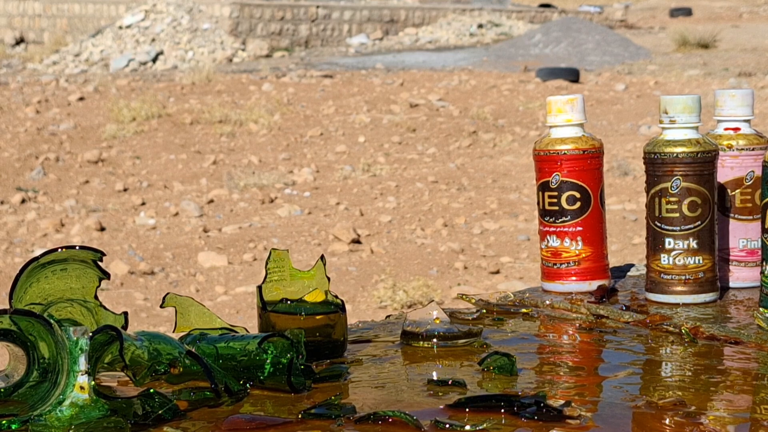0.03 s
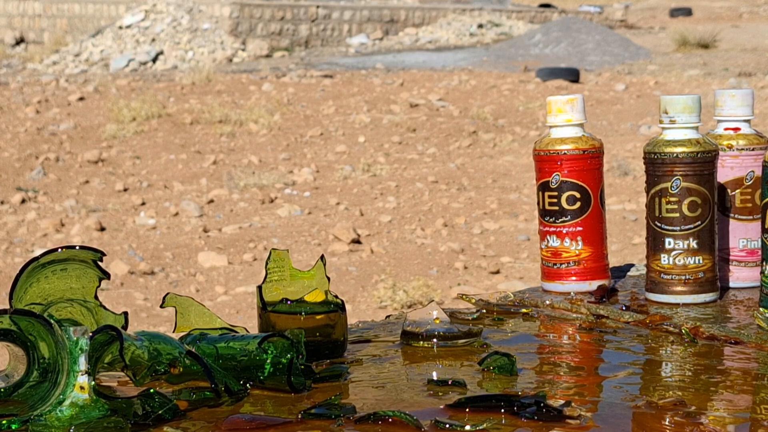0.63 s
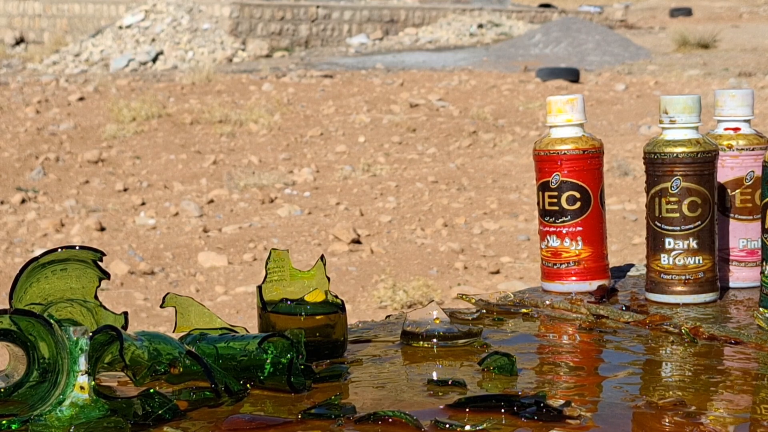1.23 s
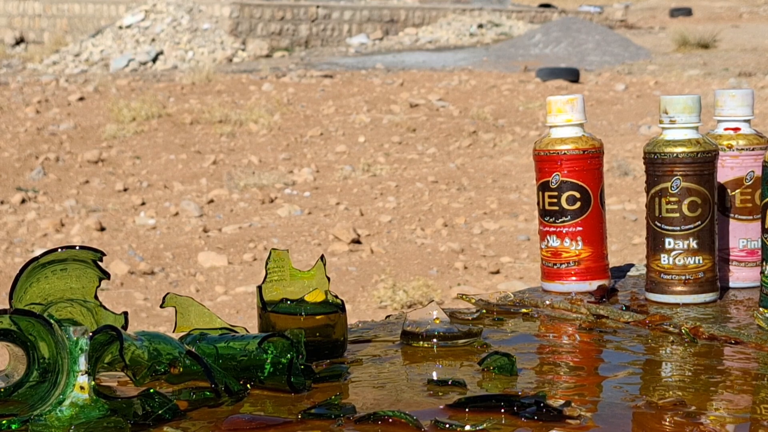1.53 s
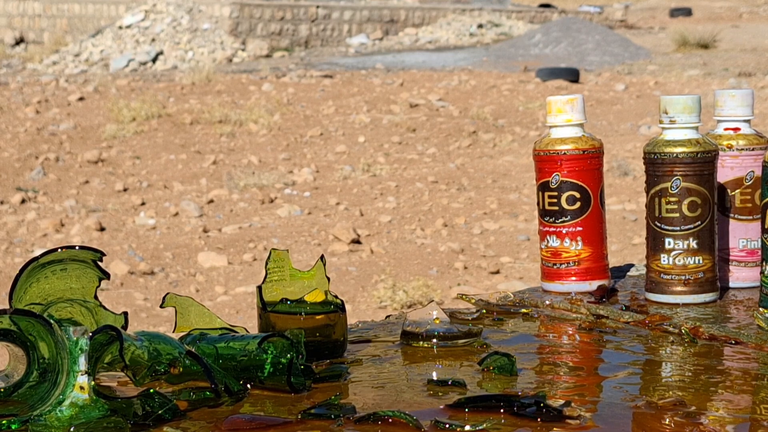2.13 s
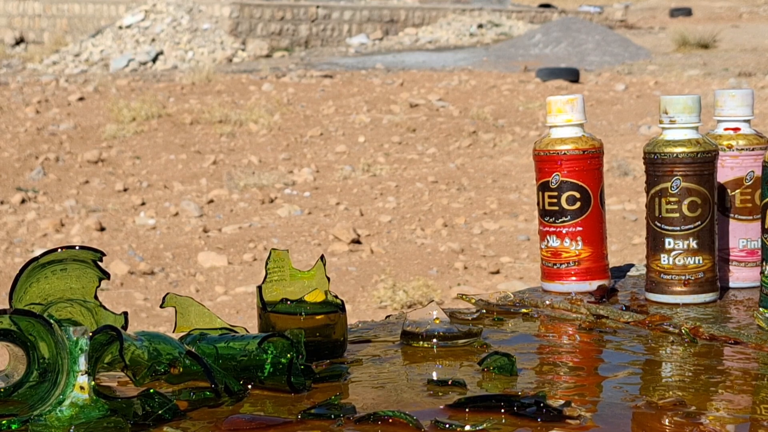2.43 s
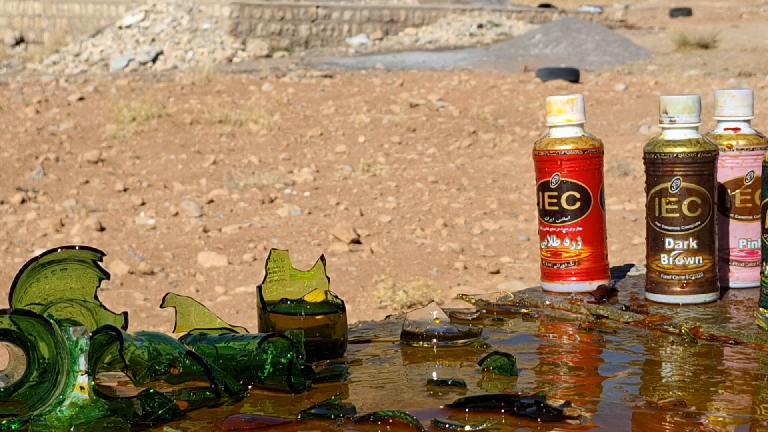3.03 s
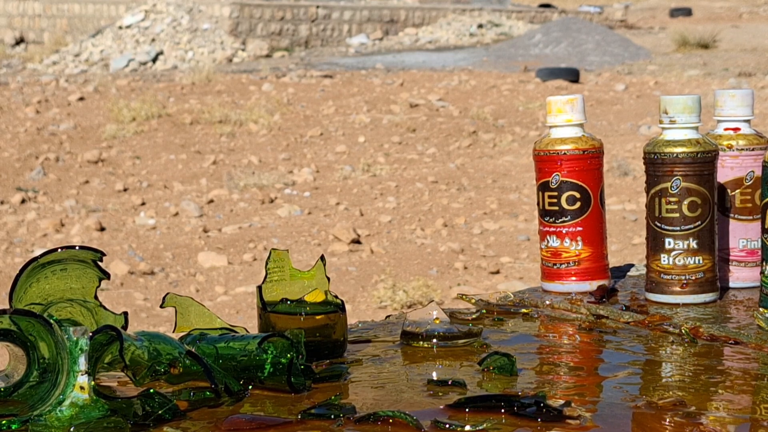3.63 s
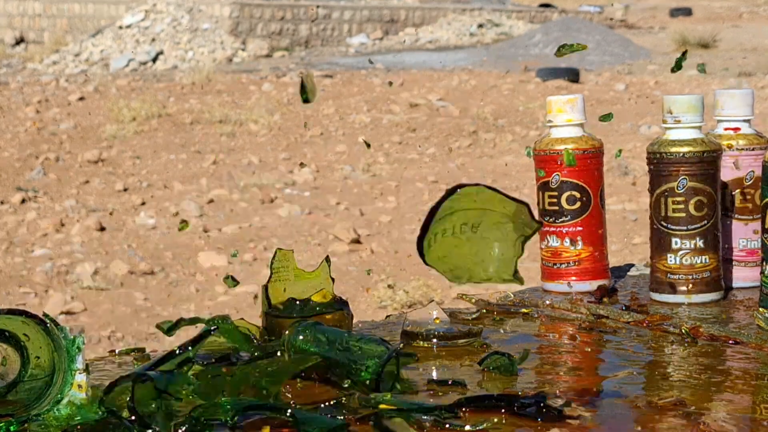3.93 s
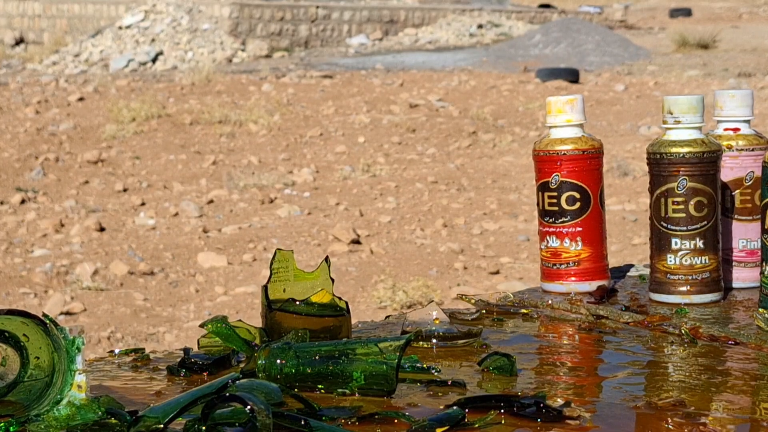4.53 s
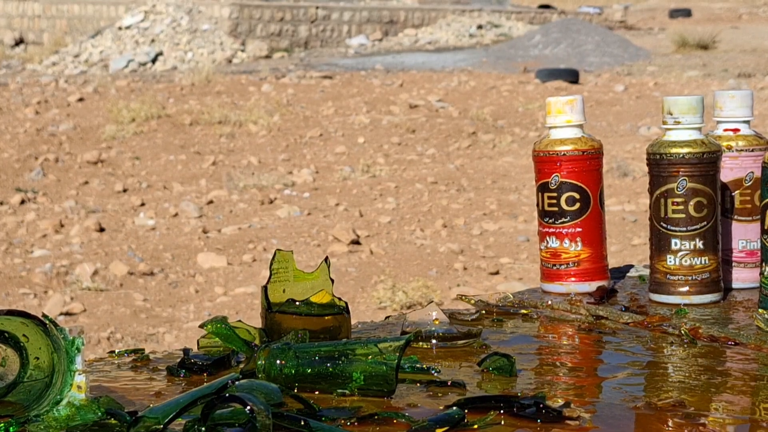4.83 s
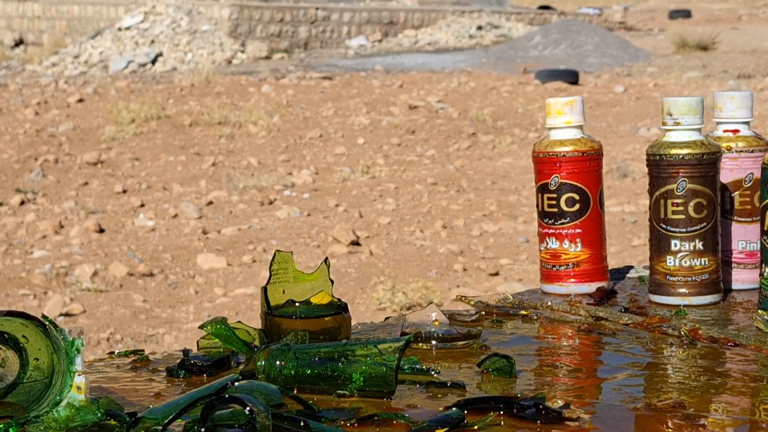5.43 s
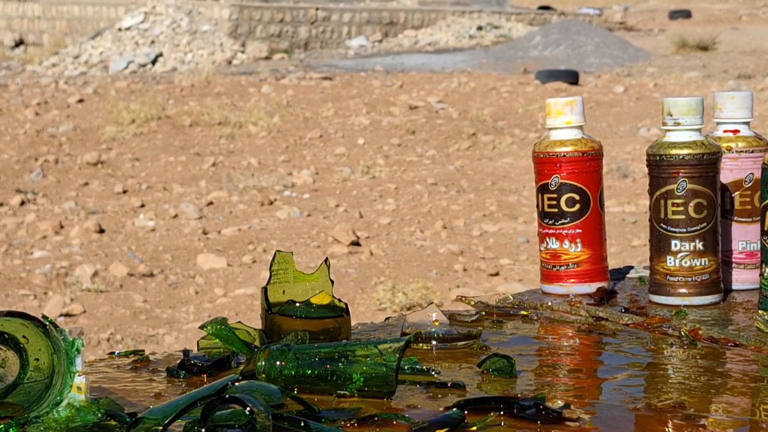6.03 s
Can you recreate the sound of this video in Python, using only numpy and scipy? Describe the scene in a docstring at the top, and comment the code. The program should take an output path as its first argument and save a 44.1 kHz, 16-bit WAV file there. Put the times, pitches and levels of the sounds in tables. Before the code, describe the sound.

For the first 3.7 seconds there is only light outdoor wind, a faint rush with soft, low thumps on the microphone. At about 3.7 seconds a thrown stone gives a very brief swish and smashes a glass bottle close by with a sharp, loud crack and a bright burst of splinters. Big pieces knock, clink and ring as they collide and land on rock until about 4.3 seconds, and a little liquid splashes at around 4.1 seconds. Smaller chips keep ticking and tinkling, skipping off to the right and growing sparse and faint until they stop at about 5.4 seconds. The smash has hardly any echo. The wind drops in level at the impact, returns about a second later and carries on softly to the end, a little after 6 seconds.

```python
"""Outdoors, on a wet rock slab close to a camera, a thrown stone swishes in and smashes a glass bottle.
Big pieces ring as they collide and land, splinters shower down, spilt liquid splashes, and the last
chips skip off to the right. Light wind thumps on the two microphones. The camera's automatic volume
turns the wind down at the smash and lets it back about a second later."""
import sys
import numpy as np
from scipy import signal
from scipy.fft import rfft, irfft, next_fast_len
from scipy.io import wavfile
from scipy.ndimage import uniform_filter1d, minimum_filter1d, map_coordinates

SR = 44100
rng = np.random.default_rng(int(sys.argv[2]) if len(sys.argv) > 2 else 0)


def transcribe(signal):
    """Save signal, clipped to [-1, 1], as a 16-bit WAV file at the path in sys.argv[1]."""
    frames = np.atleast_2d(signal).T
    limited = np.clip(frames, -1, 1)
    pcm = np.round(limited * 32767).astype(np.int16)
    wavfile.write(sys.argv[1], SR, pcm)


N = 276948

# Tone of wind on the microphones: pitch_hz, level_db
RUMBLE_TONE = [(20, -20), (55, 2), (85, -1), (190, -22), (600, -42), (3000, -105)]
# Tone of wind over open land: pitch_hz, level_db
RUSH_TONE = [(100, -15), (260, 3), (600, -3), (820, 1), (1180, -11.5), (1500, -13), (1750, -19),
             (4500, -26.5), (7500, -31.5), (12000, -25.5)]
# How strong the wind is: time_s, breeze_db, rush_db
WIND_LEVELS = [(0, -63.5, -81.5), (.5, -78.5, -84), (.75, -66, -82.5), (3.3, -67.5, -81), (4.3, -62, -82.5),
               (6.1, -71.5, -82)]
# Gusts on the microphones: middle_s, half_length_s, peak_db, left_minus_right_db
WIND_GUSTS = [(0.106, 0.16, -60, 1.5), (0.962, 0.054, -50.5, -4.5), (1.366, 0.051, -55.5, -9.5),
              (1.583, 0.064, -52, -3.5), (1.921, 0.016, -52.5, -13), (2.152, 0.062, -52.5, -1),
              (2.506, 0.03, -63, -5), (2.834, 0.038, -46.5, -2), (2.953, 0.11, -53, 2),
              (3.344, 0.054, -51.5, 2), (3.778, 0.013, -46, 7), (4.745, 0.036, -47, -1),
              (5.109, .03, -55.5, -2.5), (5.31, 0.024, -55, 0), (5.418, 0.043, -58, -0.5),
              (5.88, 0.041, -61.5, -8)]
# Echo off stony ground (a fade is the time to drop 60 dB): pitch_hz, fade_s
ECHO_FADES = [(200, 0.038), (3000, 0.11)]
# Tone of the flying stone: pitch_hz, level_db
SWISH_TONE = [(120, 1.5), (900, -4), (2000, -14.5), (16000, -20.5)]
# Tone of the spilt liquid: pitch_hz, level_db
SPLASH_TONE = [(200, -23.5), (520, -6), (850, -0.5), (1300, -10.5), (6000, -44.5)]
# Tone of glass grinding on rock: pitch_hz, level_db
GRIND_TONE = [(100, -19), (1000, -6.5), (2000, 0.5), (3000, 0), (9000, -35)]
# Tone of fine flying glass: pitch_hz, level_db
SPRAY_TONE = [(500, -18), (1600, -7.5), (4000, -2), (11000, 9), (16000, 5.5)]
# Showers of glass, from the burst to the last crumbs: start_s, length_s, level_db, fade_s
GLASS_SHOWERS = [(3.746, 0.13, -30.5, 0.31), (3.963, .05, -37.5, 0.052), (4.102, .012, -41, .08),
                 (4.033, 0.42, -51, 0.99), (4.761, 0.233, -75, 0.72), (5.296, 0.0044, -82, 0.16)]
# Chips hitting the rock: start_s, level_db, lowest_pitch_hz
CHIP_TICKS = [(3.7436, -8, 5100), (3.7845, -10, 4760), (3.8373, -8.5, 5530), (3.963, -16, 6060),
              (4.147, -18, 3840), (4.1767, -17.5, 6000), (4.265, -16.5, 4800), (4.3158, -15.5, 3960),
              (4.335, -22, 3400), (4.3918, -22, 2810), (4.4448, -21, 6640), (4.5054, -24.5, 4410),
              (4.584, -32, 2430), (4.641, -25, 2200), (4.656, -36, 1506), (4.697, -34.5, 3470),
              (4.763, -42.5, 6920), (4.9007, -50, 6020), (5.158, -54.5, 4020), (5.201, -63, 2800),
              (5.2887, -48, 6000), (5.387, -60.5, 7000)]
# Tiny flakes ringing: start_s, level_db, pitch_hz
FLAKE_PINGS = [(4.081, -38.5, 12660), (4.535, -44, 7100), (4.622, -43, 13300), (4.805, -61, 14500),
               (5.196, -75.5, 12100)]
# Knocks of grit, stone and heavy glass: start_s, level_db, pitch_hz, fade_s
HARD_KNOCKS = [(1.729, -74.5, 4050, 0.0058), (3.7436, -1, 2400, 0.0024), (3.75604, -20.5, 2303, .015),
               (3.812, -14.5, 1852, .02), (3.838, -21.5, 1295, 0.0046), (3.9, -27.5, 1490, .01),
               (3.944, -37.5, 1700, 0.0067), (3.9635, -29, 1812, .008), (3.995, -20.5, 1917, .005),
               (4.011, -28.5, 1400, 0.0021), (4.1047, -29.5, 2000, .003), (4.518, -37.5, 2990, 0.012),
               (5.087, -62, 996, 0.0085)]
# The notes of each big piece, by name: pitch_hz, level_db, fade_s
PIECE_NOTES = { "body": [(1323, -15.5, 0.15), (1944, -13.5, 0.15), (3197, -4, .09), (3757, 1, 0.13),
               (4710, 0.5, 0.21), (5770, -3.5, .18), (6550, 0, 0.06), (8280, -3, .1), (8541, -4.5, 0.18),
               (10070, -4.5, 0.1), (10953, -7.5, .15), (11400, -5.5, 0.15), (13132, -11.5, 0.1),
               (14300, -12, 0.12), (15484, 2, 0.11)], "flank": [(3800, 1.5, 0.1), (5970, -10.5, 0.28),
               (6560, -1.5, 0.089), (7840, -8.5, 0.12), (11170, -3.5, 0.13), (14580, -7.5, 0.12),
               (14940, -9.5, .08)], "neck": [(3532, -12, 0.37), (4390, -16, 0.33), (8504, 0, 0.15),
               (10766, -5, 0.08)], "shoulder": [(4830, -6, 0.15), (9690, -7.5, 0.082), (10750, -11.5, .09),
               (11030, -9, 0.099), (13330, -15, 0.087)], "lip": [(4352, 0, 0.099)],
               "sliver": [(5060, -3, 0.11), (12800, 1.5, .11)], "base": [(537, -6.5, 0.45),
               (597, -1, 0.213), (958, -2.5, .09)]}
# A big piece is struck: start_s, piece, level_db, brightness_db_per_octave
PIECE_HITS = [(3.759, "body", -26.5, 5), (3.771, "body", -28, 0.5), (3.784, "body", -24.5, 1.5),
              (3.813, "body", -33.5, -5.5), (3.8634, "body", -31, -4), (3.854, "flank", -31.5, 5),
              (3.9, "flank", -28, -4), (3.963, "flank", -34, -1.5), (4.009, "neck", -35, -7),
              (4.1168, "neck", -22, 0.5), (4.231, "neck", -48.5, 17), (4.405, "neck", -60, -8.5),
              (4.545, "neck", -53, 1), (4.6034, "neck", -48, 5), (4.718, "neck", -58.5, 8.5),
              (3.994, "shoulder", -24.5, 10), (4.104, "shoulder", -25.5, 4),
              (4.254, "shoulder", -31.5, 1.5), (4.2524, "lip", -17.5, -1), (4.011, "sliver", -35.5, 2),
              (4.0677, "sliver", -39.5, 2), (4.134, "base", -39, 0.5)]
# Pieces that fall to the right of the heap: piece, left_lead_ms
PIECE_LEAD_MS = {"neck": -0.01, "lip": -0.072}

HEAP_LEAD_MS = 0.088  # the heap is heard this much sooner on the left
TOP_HZ = 15950  # the camera's upper limit
DEBRIS_END_S = 5.6


def amp(db):
    """Turn decibels into a gain."""
    return 10 ** (np.asarray(db) / 20)


def unit(x):
    """Scale a sound to an average (rms) strength of 1."""
    return x / np.sqrt(np.mean(x ** 2) + 1e-20)


def along(points, hz):
    """Read between a table's rows on a musical (log) pitch scale."""
    pitches, values = np.transpose(points)
    return np.interp(np.log(hz + 1), np.log(pitches), values)


def filtered(x, response):
    """Multiply each frequency in x by response(hz)."""
    size = x.shape[-1]
    padded = next_fast_len(size + 8192)
    return irfft(rfft(x, padded) * response(np.fft.rfftfreq(padded, 1 / SR)), padded)[..., :size]


def coloured(x, tone):
    """Shape x with a tone table and scale it to strength 1."""
    return unit(filtered(x, lambda hz: amp(along(tone, hz))))


def stereo(x, lead_ms):
    """A sound reaches the left microphone lead_ms before the right."""
    return filtered(x, lambda hz: np.exp(np.outer([1, -1], 1j * np.pi * hz * lead_ms / 1000)))


def noise_pair(alike, lead_ms=0, size=N):
    """Stereo noise; alike is the share both sides have in common."""
    common = stereo(rng.standard_normal(size), lead_ms)
    return np.sqrt(alike) * common + np.sqrt(1 - alike) * rng.standard_normal((2, size))


def add(track, start_s, sound):
    """Mix a sound into the track."""
    part = track[:, round(start_s * SR):][:, :sound.shape[1]]
    part += sound[:, :part.shape[1]]


def wobble(per_s):
    """A smooth curve through per_s random points a second."""
    return map_coordinates(rng.standard_normal(256), [np.arange(N) * per_s / SR], mode="mirror")


def burst(start_s, db, fade_s, hold_s=0, sag_db_per_s=0, rise_s=.001):
    """A loudness curve that rises, sags while it holds, then dies away."""
    age = np.maximum(np.arange(N) / SR - start_s, 0)
    level_db = db - sag_db_per_s * np.minimum(age, hold_s) - 60 * np.maximum(age - hold_s, 0) / fade_s
    return np.minimum(age / rise_s, 1) * amp(level_db)


def grains(loudness, tone, per_s, low_hz, high_hz, cycles, spread_db, size):
    """Many tiny fading notes of random pitch, strength and direction follow a loudness curve."""
    when, pitch, strength, life, place = rng.random((int(per_s * DEBRIS_END_S), 5)).T[:, :, None]
    start, t = (DEBRIS_END_S * when * SR).astype(int), np.arange(size) / SR
    heard = loudness[start[:, 0]] > 0
    start, pitch, strength, life, place = [x[heard] for x in (start, pitch, strength, life, place)]
    hz = low_hz * (high_hz / low_hz) ** pitch
    fade = amp(spread_db * strength ** 3 - 60 * t * hz / (cycles * (.5 + life)))
    fade = fade * loudness[start] / np.sqrt(np.sum(fade ** 2) / len(start) * per_s / (2 * SR))
    index = (start + np.arange(size)).ravel()
    rings = [fade * np.sin(2 * np.pi * hz * (t + side * place * .0001)) for side in (1, -1)]
    shower = np.array([np.bincount(index, ring.ravel(), N)[:N] for ring in rings])
    return shower.std() * coloured(shower, tone)


def wind():
    """Swirls of air thump on each microphone separately, over the even rush of open land."""
    t = np.arange(N) / SR
    swirls = coloured(noise_pair(alike=0.013), RUMBLE_TONE)
    swell = np.sqrt(np.abs(uniform_filter1d(np.mean(swirls ** 2, axis=0), size=2500)) + 0.011)
    gust_power = sum(amp([[db + pan / 2], [db - pan / 2]]) ** 2 * np.exp(-2 * ((t - s) / half_s) ** 2)
                     for s, half_s, db, pan in WIND_GUSTS)
    times, *levels = np.transpose(WIND_LEVELS)
    breeze_db, rush_db = [np.interp(t, times, db) for db in levels]
    breeze = amp(breeze_db + 3.5 * wobble(per_s=7.3)) * amp([[-9.5], [0]])  # the left is sheltered
    flutter = amp(4 * wobble(per_s=36) - 1)
    thumps = np.hypot(breeze, np.sqrt(gust_power)) * flutter * swirls / swell
    # the low rush comes from the left, the hiss from all around
    low_share = lambda hz: 1 / (1 + (hz / 1100) ** 4)
    rush = filtered(noise_pair(alike=0.72, lead_ms=0.49), lambda hz: np.sqrt(low_share(hz)))
    hiss = filtered(rng.standard_normal((2, N)), lambda hz: np.sqrt(1 - low_share(hz)))
    return thumps + amp(rush_db) * coloured(rush + hiss, RUSH_TONE)


def ground_echo(x):
    """Stones all around scatter back a short echo."""
    hz, t, spectrum = signal.stft(rng.standard_normal((2, SR // 2)), SR, nperseg=256)
    fade = amp(-60 * t / along(ECHO_FADES, hz)[:, None])
    tail = signal.istft(spectrum * fade, SR, nperseg=256)[1]
    return signal.fftconvolve(x, tail / np.linalg.norm(tail[0]), axes=1)[:, :N]


def swish(peak_s=3.7355, rise_db_per_s=2003.5, fall_db_per_s=4998):
    """Air rushes around the flying stone."""
    past_s = np.arange(N) / SR - peak_s
    loudness = amp(-27.5 + np.minimum(rise_db_per_s * past_s, -fall_db_per_s * past_s))
    return loudness * coloured(noise_pair(alike=0.71, lead_ms=0.45), SWISH_TONE)


def splash(start_s=4.129):
    """Liquid slaps down and bursts into drops and bubbles; a few drops patter on."""
    slap = burst(start_s, db=-38, fade_s=0.15, rise_s=0.0045)
    patter = burst(start_s, db=-59.5, fade_s=0.832)
    return grains(slap + patter, SPLASH_TONE, per_s=450, low_hz=507, high_hz=1772,
                  cycles=30, spread_db=2, size=1500)


def debris():
    """Splinters crackle, shards tinkle, chips shed glass dust and heavy bits grind."""
    shower = sum(burst(s, db, fade_s, length_s, sag_db_per_s=17.5)
                 for s, length_s, db, fade_s in GLASS_SHOWERS)
    splinters = grains(shower, SPRAY_TONE, per_s=800, low_hz=2500, high_hz=TOP_HZ,
                       cycles=3.5, spread_db=10, size=200)
    strong = shower.max() * (shower / shower.max()) ** 1.18  # shards fly mostly in strong showers
    shards = grains(strong, SPRAY_TONE, per_s=600, low_hz=2950, high_hz=TOP_HZ,
                    cycles=220, spread_db=7.5, size=5000)
    puffs = sum(burst(s, db - 32.5, fade_s=0.16) for s, db, _ in CHIP_TICKS)
    dust = grains(puffs, SPRAY_TONE, per_s=4500, low_hz=6000, high_hz=TOP_HZ,
                  cycles=8, spread_db=9, size=100)
    scuff = burst(2.185, db=-69.5, fade_s=0.18, hold_s=0.015, rise_s=0.015)  # grit, before the throw
    grind = grains(shower + scuff, GRIND_TONE, per_s=800, low_hz=599.3, high_hz=4000,
                   cycles=1.9, spread_db=16, size=600)
    return amp(-1.5) * splinters + amp(0.5) * shards + dust + amp(-10.5) * grind


def chips():
    """Glass ticks on the rock, farther right as time passes; each chip hops once more."""
    out, t = np.zeros((2, N)), np.arange(SR // 12) / SR
    hops = [(s + 0.0089 * (.5 + rng.random()), db - 9.5, hz) for s, db, hz in CHIP_TICKS]
    contacts = [(s, db - 0.5, 3329) for s, _, db, _ in PIECE_HITS]  # big pieces tick too
    for start_s, db, low_hz in CHIP_TICKS + hops + contacts:
        lead_ms = np.interp(start_s, [3.75, 4.35], [.08, -.4])
        hz = low_hz * (TOP_HZ / low_hz) ** rng.random(size=(9, 1))
        ring = np.mean(np.sin(2 * np.pi * hz * t), axis=0) * amp(-60 * t / 0.024)
        band = lambda f: 1 / np.hypot(1, (low_hz / (f + 1)) ** 2) / np.hypot(1, f / (2.7 * low_hz))
        noise = filtered(noise_pair(alike=1, lead_ms=lead_ms, size=len(t)), band)
        snap = unit(noise) * amp(-60 * t / 0.0067)
        add(out, start_s, amp(db) * (amp(-9.5) * snap + amp(-7) * stereo(ring, lead_ms)))
    return out * amp([[-1.5], [1.5]])


def flakes(fade_s=0.078):
    """Each tiny flake rings with one thin note."""
    out, t = np.zeros((2, N)), np.arange(SR // 3) / SR
    for start_s, db, hz in FLAKE_PINGS:
        ping = np.sin(2 * np.pi * hz * t) * amp(db - 60 * t / fade_s)
        add(out, start_s, stereo(ping, HEAP_LEAD_MS))
    return out


def knocks():
    """Stone and heavy glass collide with short, dull, crunchy knocks."""
    out, t = np.zeros((2, N)), np.arange(SR // 20) / SR
    bass_cut = lambda f: 1j * f / (600 + 1j * f)  # small things give off little bass
    for start_s, db, hz, fade_s in HARD_KNOCKS:
        push = stereo(-np.sin(2 * np.pi * hz * t) * amp(-60 * t / fade_s), HEAP_LEAD_MS)
        noise = noise_pair(alike=0.21, lead_ms=HEAP_LEAD_MS, size=len(t))
        crunch = unit(filtered(noise, lambda f: 1 / np.hypot(1, (f / hz) ** 2)))
        knock = push + crunch * amp(-16 - 60 * t / 0.017)
        add(out, start_s, amp(db) * filtered(knock, bass_cut))
    return out


def rocking(t, notes, per_s=110):
    """A piece rocks on the slab: one random flutter curve for each of its notes."""
    points = rng.standard_normal((notes, 64))
    return np.array([map_coordinates(row, [t * per_s], mode="mirror") for row in points])


def big_pieces(flutter_db=3, flutter_hz=14):
    """Each big piece rings with its own notes, started anew by every hit."""
    out, t = np.zeros((2, N)), np.arange(SR // 3) / SR
    for start_s, piece, db, brightness in PIECE_HITS:
        hz, note_db, fade_s = np.transpose(PIECE_NOTES[piece])[:, :, None]
        start_db = db + note_db + brightness * np.log2(hz / 7000)
        lost_db = 60 * (t / fade_s) ** 1.314  # fades faster as it settles on the wet rock
        attack = 1 - np.exp(-t / 0.0001)
        loudness = attack * amp(start_db - lost_db + flutter_db * rocking(t, len(hz)))
        start_phase = rng.random(hz.shape)
        pitch_hz = hz + flutter_hz * rocking(t, len(hz))
        phase = 2 * np.pi * (start_phase + np.cumsum(pitch_hz, axis=1) / SR)
        turn = 0.4 * rng.standard_normal(hz.shape)  # the piece faces another way each time
        ring = np.array([np.sum(loudness * np.sin(phase + side * turn), axis=0) for side in (1, -1)])
        add(out, start_s, stereo(ring, PIECE_LEAD_MS.get(piece, HEAP_LEAD_MS)))
    return out


def automatic_volume(x, aim_db=-33.5, max_lift_db=13.5, hold_s=0.66, recover_db_per_s=41.5):
    """Quiet sound is lifted; a loud one takes the lift away at once. After a wait it climbs back."""
    above_rumble = filtered(x, lambda hz: hz > 300)
    power = np.abs(uniform_filter1d(np.mean(above_rumble ** 2, axis=0), size=SR // 100))
    wanted_db = np.clip(aim_db - 10 * np.log10(power + 1e-20), 0, max_lift_db)
    half = int(hold_s * SR / 2)
    held_db = minimum_filter1d(wanted_db, 2 * half + 1, origin=half, mode="nearest")
    climb_db = recover_db_per_s * np.arange(N) / SR
    return x * amp(np.minimum.accumulate(held_db - climb_db) + climb_db)


def scene():
    """The smash, its faint echo and the wind."""
    hits = swish() + knocks() + chips() + debris() + splash()
    rings = (big_pieces() + flakes()) * amp([[-.8], [.8]])  # a little louder on the right
    return hits + rings + ground_echo(amp(-8.5) * hits + amp(-22.5) * rings) + wind()


def record(dry):
    """The camera sets its own volume and cuts off the highest treble."""
    return filtered(automatic_volume(dry), lambda hz: np.clip((TOP_HZ - hz) / 200 + .5, 0, 1))


dry = scene()
out = record(dry)
transcribe(out)
```